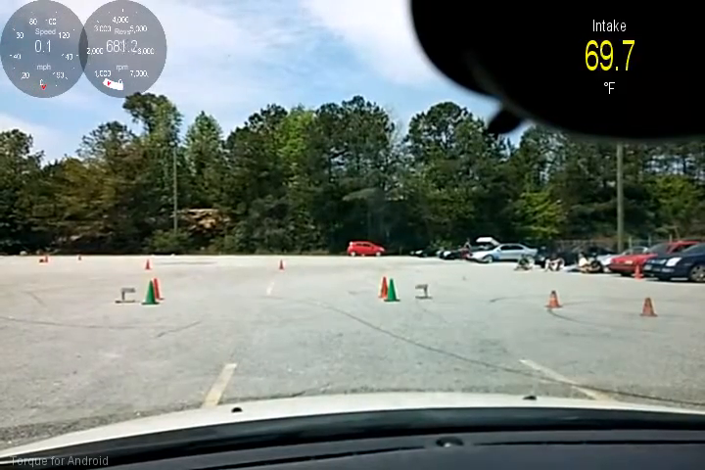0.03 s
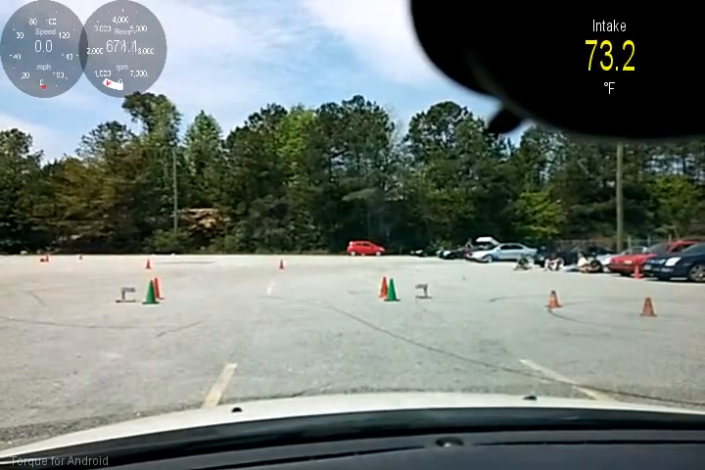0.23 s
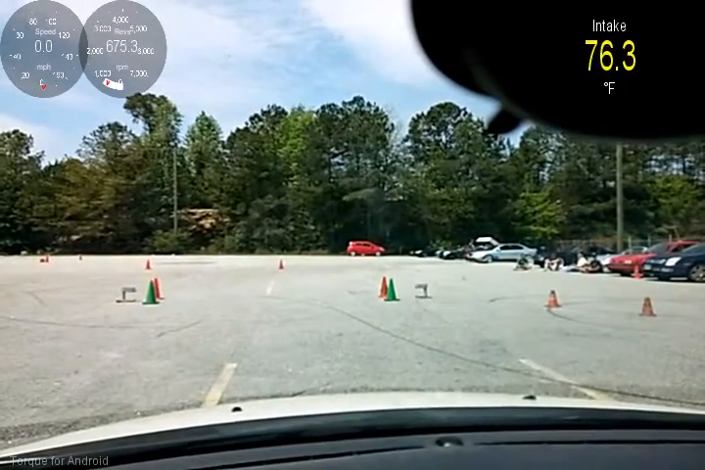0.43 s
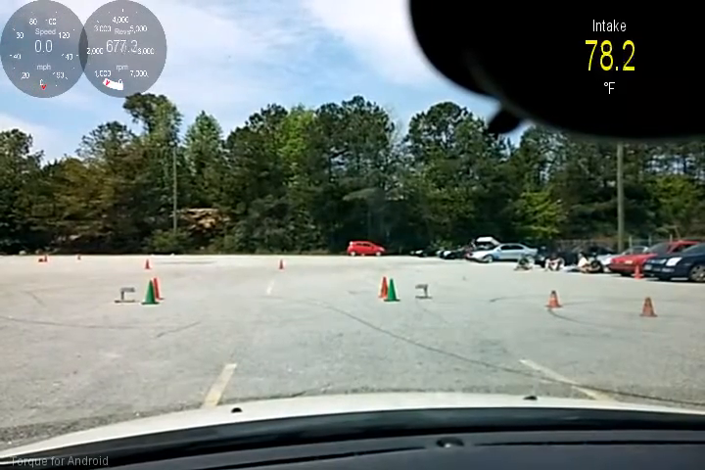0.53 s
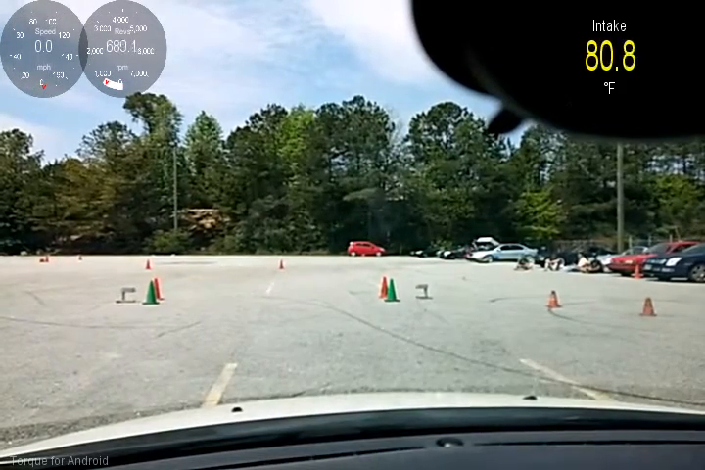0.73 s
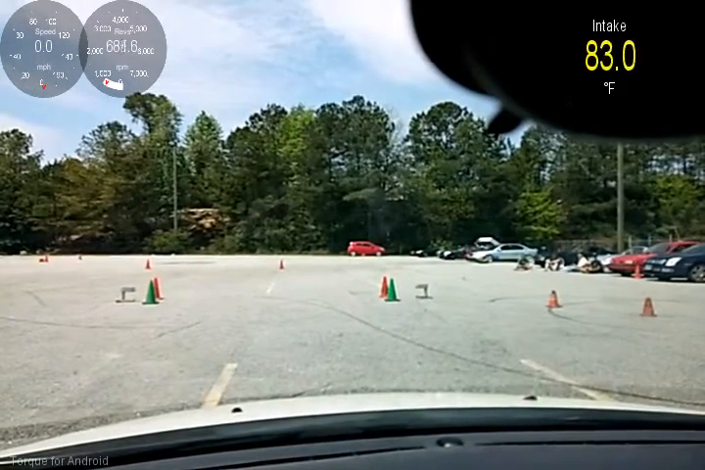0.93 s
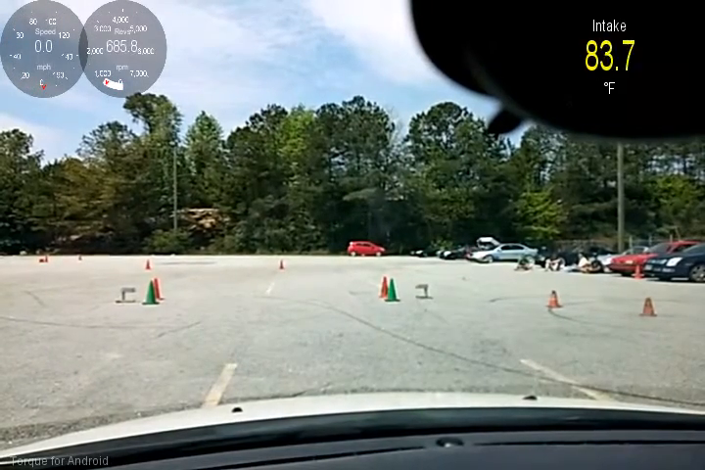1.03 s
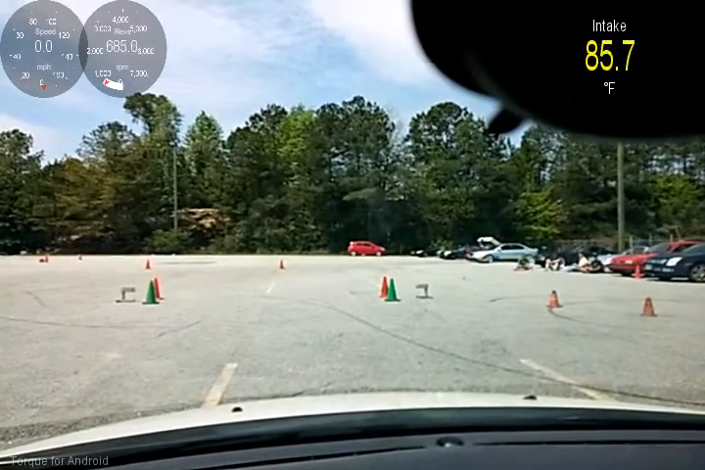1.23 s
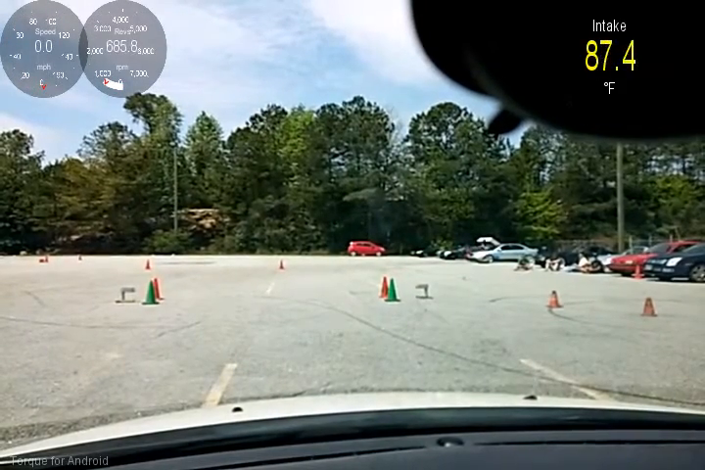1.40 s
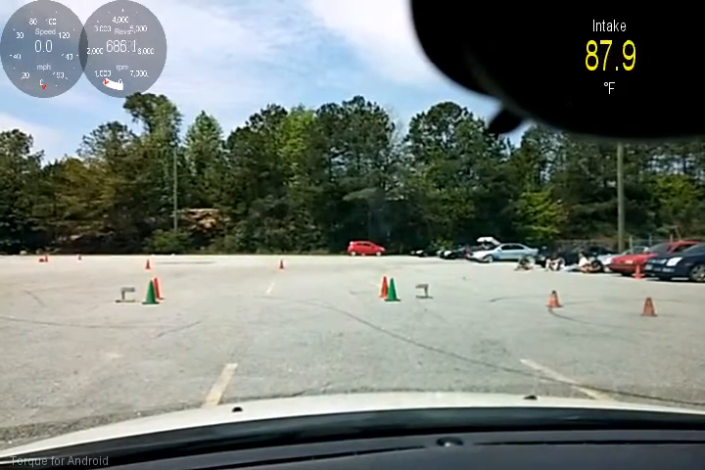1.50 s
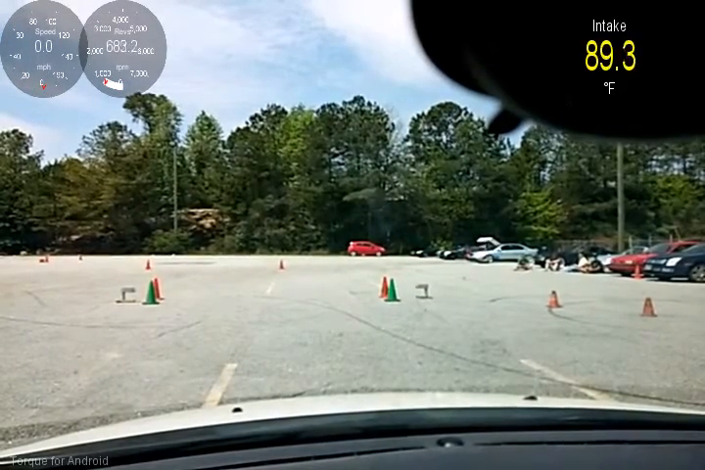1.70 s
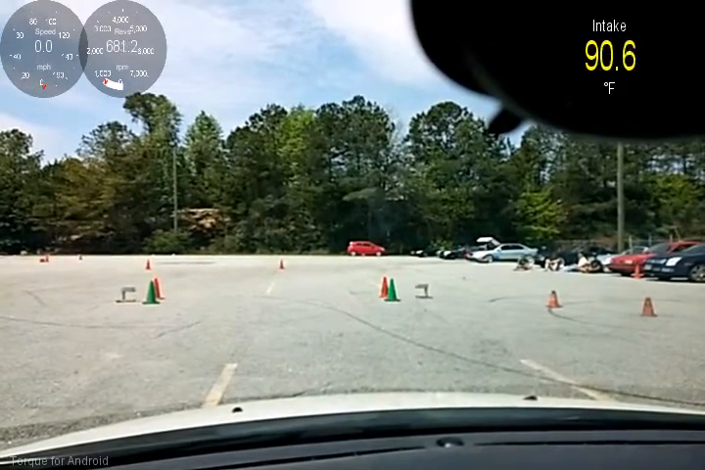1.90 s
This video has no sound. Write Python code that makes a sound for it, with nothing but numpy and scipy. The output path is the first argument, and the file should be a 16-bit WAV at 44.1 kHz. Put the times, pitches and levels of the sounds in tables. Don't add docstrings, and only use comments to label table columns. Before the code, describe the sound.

Low idling car engine heard from inside, with one heavy double clunk, then lighter knocks

```python
import sys
import numpy as np
from scipy import signal
from scipy.fft import rfft, irfft
from scipy.io import wavfile
from scipy.ndimage import uniform_filter1d

SR = 44100
rng = np.random.default_rng(int(sys.argv[2]) if len(sys.argv) > 2 else 0)


def generate_wav(signal):
    frames = np.transpose(np.atleast_2d(signal))
    scaled = np.clip(frames, -1, 1) * 32767
    pcm = np.round(scaled).astype(np.int16)
    wavfile.write(sys.argv[1], SR, pcm)


def gain_from_db(level_db):
    decades = np.asarray(level_db, float) / 20
    return 10 ** decades


N = 85995


def evened(x):
    return x / np.sqrt(np.mean(x ** 2) + 1e-20)


def along(rows, col=1):
    r = np.array(rows)
    return np.interp(np.arange(N) / SR, r[:, 0], r[:, col])


def add(mix, start_s, sound):
    part = mix[round(start_s * SR):][:len(sound)]
    part += sound[:len(part)]


def noise():
    return rng.standard_normal(N)


def band(x, low_hz, high_hz):
    sos = signal.butter(3, [low_hz, min(high_hz, SR / 2.2)], "band", fs=SR, output="sos")
    return signal.sosfilt(sos, x)


def drift(per_s):
    hz = np.fft.rfftfreq(N, 1 / SR)
    return evened(irfft(rfft(noise()) * (hz > 0) / (1 + (hz / per_s) ** 4), N))


def coloured(points):
    f, db = np.transpose(points)
    hz = np.fft.rfftfreq(N, 1 / SR) + 1
    shape_db = np.interp(np.log(hz), np.log(f), db, -60, -60)
    return evened(irfft(rfft(noise()) * gain_from_db(shape_db), N))


# time in seconds, level in dB.
IDLE_LEVEL = [(0, -39), (.3, -34), (.6, -33), (.9, -36.5), (1.04, -33), (1.17, -37.5), (1.3, -34),
              (1.45, -36), (1.6, -33.5), (1.75, -32), (1.95, -33)]
# multiple of the firing rate, gain in dB.
CABIN_RESPONSE = [(1, -30), (2, -3), (3, -8), (4, -10), (5, 0), (6, -9), (7, -4), (8, -4.5), (9, -10),
                  (10, -30), (11, -20), (12, -34), (14, -32), (15, -27), (16, -42)]
# frequency in Hz, level in dB, waver in dB.
HUMS = [(56.8, -44, 2), (340.5, -56, 1)]
# frequency in Hz, density in dB per Hz.
RUMBLE_SPECTRUM = [(15, -39.5), (36, -15), (60, 4), (90, -5), (165, 8), (230, -5.5), (289, -16), (389, -16),
                   (682, -25.5), (1300, -41.5), (1690, -74.5), (2860, -120)]
# frequency in Hz, density in dB per Hz.
HISS_SPECTRUM = [(900, -14.5), (1500, -26), (2200, -24), (3200, -53), (5000, -39.5), (6700, -27),
                 (8300, -31), (9200, -45)]


def engine():
    firings_per_s, first_firing_s = 22.725, .0453
    jitter_s, uneven_db, weak_cylinder_db = .0004, 1.6, -2
    rumble_db, throb_db, hiss_db = -39, 1, -65
    t = np.arange(N) / SR
    turns = (t - first_firing_s) * firings_per_s
    at = np.flatnonzero(np.diff(np.floor(turns)) > 0)
    late_s = jitter_s * rng.standard_normal(len(at))
    strength_db = uneven_db * rng.standard_normal(len(at)) + weak_cylinder_db * (np.arange(len(at)) % 2)
    fire = np.zeros(N)
    fire[np.clip(at + (late_s * SR).astype(int), 0, N - 1)] = gain_from_db(strength_db)

    multiple, db = np.transpose(CABIN_RESPONSE)
    size = 16384
    order = abs(np.fft.fftfreq(size, 1 / SR)) / firings_per_s
    gain_db = np.interp(order, np.r_[0, multiple, 20, 40], np.r_[-60, db, -60, -140])
    body = np.fft.fftshift(np.fft.ifft(gain_from_db(gain_db)).real) * np.hanning(size)
    ringing = signal.fftconvolve(fire, body)[size // 2:size // 2 + N]
    out = evened(ringing) * gain_from_db(along(IDLE_LEVEL))

    for hz, db, waver_db in HUMS:
        out += gain_from_db(db + waver_db * drift(10)) * np.sqrt(2) * np.sin(2 * np.pi * hz * t)
    throb = throb_db * np.cos(2 * np.pi * (turns - .1)) + drift(2.4)
    out += coloured(RUMBLE_SPECTRUM) * gain_from_db(rumble_db + throb)
    return out + coloured(HISS_SPECTRUM) * gain_from_db(hiss_db + 0.48 * drift(24))


# time in seconds, fundamental in Hz, level in dB.
FAR_PITCH = [(.75, 132, -64), (1.0, 146, -59), (1.25, 158, -57), (1.55, 168, -62), (1.95, 172, -66)]


def far_engine():
    turns = np.cumsum(along(FAR_PITCH) * (1 + 0.0082 * drift(39))) / SR
    stack = np.zeros(N)
    for k in range(2, 6):
        stack += np.cos(2 * np.pi * k * turns + k * k) * gain_from_db(2 * drift(21) - 2 * k)
    return stack * gain_from_db(along(FAR_PITCH, col=2) + 4)


# time in seconds, level in dB, brightness in Hz.
YARD_LEVEL = [(0, -52, 1030), (.3, -45.5, 890), (.55, -49, 927), (.8, -55.5, 910), (1.0, -53.5, 698),
              (1.2, -51, 756), (1.5, -50, 1400), (1.95, -51.5, 1094)]
# frequency in Hz, width in Hz, level in dB.
GLASS_PEAKS = [(251.6, 94, -4), (473, 60, -11.5), (620, 189, -9), (841.4, 113, -12.5), (984.5, 110, -12),
               (1350, 170, -13.5)]
# time in seconds, frequency in Hz.
LOUDEST_BAND = [(.12, 850), (.25, 500), (.6, 580), (1.1, 480), (1.5, 560), (1.68, 900)]


def yard():
    reach_hz, focus_hz = along(YARD_LEVEL, col=2), along(LOUDEST_BAND)
    air = np.zeros(N)
    for hz, width, db in GLASS_PEAKS:
        focus_db = 6 * np.exp(-20 * np.log(hz / focus_hz) ** 2)
        mode = evened(band(noise(), hz - width / 2, hz + width / 2))
        air += mode * gain_from_db(db + 2.24 * drift(16.3) + focus_db) / (1 + (hz / reach_hz) ** 6)
    return air * gain_from_db(along(YARD_LEVEL))


# start in seconds, length in seconds, frequency in Hz,
# width in Hz, level in dB.
SWELLS = [(.0, 0.11, 817, 70, -60.5), (0.245, 0.11, 484, 60, -49), (0.476, .14, 620, 60, -54),
          (1.137, 0.18, 488, 60, -53), (1.17, 0.083, 690, 80, -59), (1.424, 0.2, 525, 90, -53.5),
          (1.454, .12, 1400, 160, -62.5), (1.587, 0.15, 1330, 150, -61.5), (1.671, 0.13, 998, 110, -56.5),
          (1.728, 0.16, 850, 119, -53.5), (1.853, 0.059, 1340, 60, -65.5)]


def swells():
    out, air = np.zeros(N), noise()
    for start, length, hz, width, db in SWELLS:
        piece = band(air, hz - width / 2, hz + width / 2)[round(start * SR):][:round(length * SR)]
        add(out, start, evened(piece) * np.sqrt(np.hanning(len(piece))) * gain_from_db(db))
    return out


# time in seconds, level in dB.
ROAD_LEVEL = [(0, -72.5), (.3, -59.5), (.43, -57), (.47, -91.5), (.58, -72), (.66, -68.5), (.71, -80.5),
              (.95, -76), (1.05, -72), (1.3, -73.5), (1.55, -71.5), (1.95, -71)]


def road():
    return evened(band(noise(), 1400, 4450)) * gain_from_db(along(ROAD_LEVEL) + 2.6 * drift(23))


# time in seconds, level in dB.
RUSTLE_LEVEL = [(0, -65.5), (.15, -62), (.25, -56), (.43, -56), (.475, -63), (.52, -58.5), (.56, -55.5),
                (.625, -65.5), (.66, -49.5), (.7, -53.5), (.74, -64), (.83, -68), (.865, -59.5),
                (.9, -76.5), (1.02, -64.5), (1.2, -99)]


def rustle():
    edges_hz = np.linspace(3740, 8400, num=5)
    patchy_db, tilt_db_per_khz = 2.2, 0.94
    cloth = np.zeros(N)
    for low, high in zip(edges_hz, edges_hz[1:]):
        strip = band(band(noise(), low, high), low, high)
        cloth += strip * gain_from_db(patchy_db * drift(12) + tilt_db_per_khz * (low - edges_hz[0]) / 1000)
    settling = along([(1.2, 0.78), (1.3, 0.076)])
    return evened(cloth) * gain_from_db(along(RUSTLE_LEVEL) + 1.6 * drift(40)) * settling


# start in seconds, length in seconds, first frequency in Hz,
# last frequency in Hz, level in dB.
SQUEAKS = [
    (.07, .09, 2030, 1990, -70),
    (.21, .18, 2050, 2560, -62),
    (.45, .06, 2440, 2490, -69),
    (.70, .07, 2100, 2050, -69),
    (.80, .23, 1990, 2490, -68),
    (1.104, .02, 2990, 2930, -61),
]


def squeaks():
    width_hz, tone = 70, .63
    out = np.zeros(N)
    wobble, fuzz = drift(width_hz), drift(width_hz)
    for start, length, from_hz, to_hz, db in SQUEAKS:
        t = np.arange(0, length, 1 / SR)
        i = round(start * SR) + np.arange(len(t))
        phase = 2 * np.pi * np.cumsum(from_hz + (to_hz - from_hz) * t / length) / SR
        in_phase = (tone + (1 - tone) * wobble[i]) * np.sin(phase)
        quadrature = (1 - tone) * fuzz[i] * np.cos(phase)
        swell = np.sqrt(abs(np.sin(np.pi * (t / length) ** 1.3)))
        add(out, start, (in_phase + quadrature) * gain_from_db(db + 8) * swell)
    return out


# start in seconds, level in dB, 60 dB decay in seconds,
# lowest frequency in Hz, highest frequency in Hz.
CONTACTS = [(0.1641, -24.5, 0.044, 503, 3300), (0.169, -25, 0.053, 1820, 10760),
            (0.1721, -30, 0.017, 1860, 3260), (0.178, -25, 0.077, 540, 7140),
            (0.187, -54, 0.038, 900, 6500), (0.2056, -30.5, 0.097, 599, 5360),
            (0.31, -45.5, .04, 453, 1090), (0.387, -36, 0.17, 498, 3000), (0.389, -43.5, 0.13, 2540, 9250),
            (0.398, -39, 0.043, 400, 2500), (0.401, -50.5, .07, 2360, 8850),
            (0.415, -32.5, 0.071, 348, 900), (0.423, -39, 0.067, 291, 2800), (.437, -31.5, 0.029, 298, 900),
            (0.446, -43, 0.11, 292, 2600), (.481, -42, 0.04, 352, 1000), (0.668, -38, 0.055, 1730, 10000),
            (0.672, -34.5, .045, 350, 1300), (1.834, -49, .03, 600, 1100)]
# frequency in Hz, density in dB per Hz.
CONTACT_SPECTRUM = [(240, -43), (400, 3.5), (640, 1), (1040, -14), (1360, -11.5), (1640, -16.5),
                    (5860, -24.5), (8420, -32.5), (9890, -55), (12900, -97), (21800, -120)]


def contacts():
    out, grit = np.zeros(N), coloured(CONTACT_SPECTRUM)
    for start, db, t60, low_hz, high_hz in CONTACTS:
        t = np.arange(0, t60, 1 / SR)
        piece = band(grit[round(start * SR):][:len(t)], low_hz, high_hz)
        attack = np.minimum(t / 0.0013, 1)
        add(out, start, evened(piece) * gain_from_db(db - 60 * t / t60) * attack)
    return out


# start in seconds, peak in dB,
# frequency in Hz, length in seconds, sign of the first swing.
THUMPS = [
    (.1762, -4, 143, .022, 1),
    (.2043, -5, 154, .05, -1),
    (.2043, -11, 154, .011, -1),
    (.684, -25, 66, .09, 1),
    (.69, -47, 575, .1, 1),
          (.6706, -18, 590, .007, 1),
    (.6706, -30, 760, .01, 1),
    (.670, -36, 1130, .012, 1),
    (.3945, -14, 158, .045, 1),
          (.177, -38, 603, 0.0049, 1), (0.2002, -11.5, 69.7, 0.0047, 1), (.205, -36, 816, 0.021, 1),
               (.207, -15, 307.3, 0.021, 1), (0.228, -11.5, 100, 0.023, 1), (.236, -15, 140.5, 0.0038, -1),
               (.261, -14.5, 134.7, 0.014, -1), (0.293, -21.5, 140.4, 0.01, 1),
               (0.304, -16, 102, 0.0071, 1), (0.339, -28, 64, 0.12, 1), (0.4155, -15, 184, 0.0049, 1),
               (0.424, -26, 251.7, 0.036, 1), (.4352, -31, 145.8, 0.018, -1), (0.46, -18.5, 147, 0.0074, 1),
               (0.477, -20, 161.5, 0.015, 1), (0.39, -36.5, 813, 0.039, 1), (.40, -45, 1810, 0.028, 1),
               (0.407, -31.5, 620, 0.033, 1), (0.425, -27, 402, 0.02, 1), (.433, -30, 370, 0.024, -1),
               (.387, -33.5, 446, .015, 1), (0.438, -38.5, 585, 0.017, 1), (.669, -43, 2070, 0.0064, 1),
               (0.673, -29, 355, 0.023, 1)]


def thumps():
    out = np.zeros(N)
    for start, db, hz, length, sign in THUMPS:
        t = np.arange(0, 2 * length, 1 / SR)
        u = t / (0.26 * length)
        envelope = (u * np.exp(1 - u)) ** 1.37
        add(out, start, np.sign(sign) * gain_from_db(db) * envelope * np.sin(2 * np.pi * hz * t))
    return out


def cabin(blows):
    t60_s = 0.4
    t = np.arange(0, t60_s, 1 / SR)
    tail = band(rng.standard_normal(len(t)), 190, 900) * gain_from_db(-60 * t / t60_s)
    tail *= np.minimum(t / 0.055, 1)
    return signal.fftconvolve(blows, tail / np.linalg.norm(tail))[:N] * gain_from_db(-26.5)


def scene():
    blows = contacts() + thumps()
    outside = far_engine() + yard() + swells() + road()
    return (engine() + outside + rustle() + squeaks() + blows + cabin(blows))[None]


def gate(x):
    floor_db, low_hz, follow, hold_frames = -102, 1400, .55, 11
    unsure_db, keen_db, keen_hz = 1.3, 4.5, 3900
    hz, _, z = signal.stft(x, SR, nperseg=2048, noverlap=1024)
    group = np.floor(7 * np.log2(hz / low_hz + 1e-9)).astype(int).clip(-1) + 1
    member = (group[None] == np.arange(group.max() + 1)[:, None]) * 1.
    count = np.maximum(member.sum(1), 1)
    power_db = 10 * np.log10(member @ abs(z) ** 2 / count[:, None] + 1e-20)
    centre_hz = member @ hz / count
    keen = keen_db * np.exp(-10 * np.log(centre_hz / keen_hz + 1e-9) ** 2)
    unsure = evened(uniform_filter1d(rng.standard_normal(power_db.shape), size=3, axis=1))
    bass_db = uniform_filter1d(power_db[:1], hold_frames, axis=1, origin=3)
    limit_db = floor_db + follow * (bass_db + 56.5) + unsure_db * unsure + keen[:, None]
    keep = np.clip(power_db - limit_db + .5, 0, 1)
    keep[0] = 1
    return signal.istft(z * keep[group], SR, nperseg=2048, noverlap=1024)[1][:N]


def low_pass(x):
    return signal.sosfilt(signal.butter(12, 10040, fs=SR, output="sos"), x)


def record(dry):
    fade_in = along([(0, 0), (.004, 1)])
    x = band(dry[0], 28, 15000) * fade_in
    return low_pass(gate(x)[None])


dry = scene()
out = record(dry)
generate_wav(out)
```